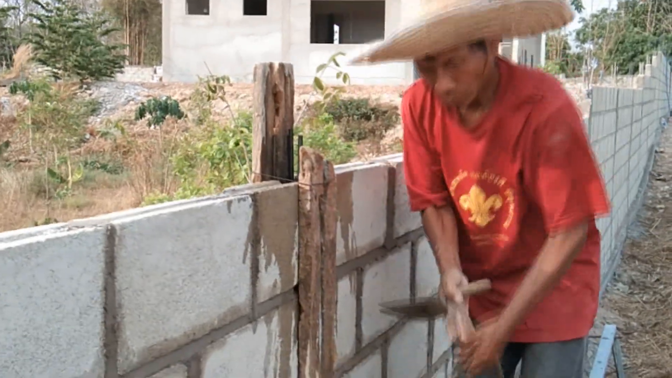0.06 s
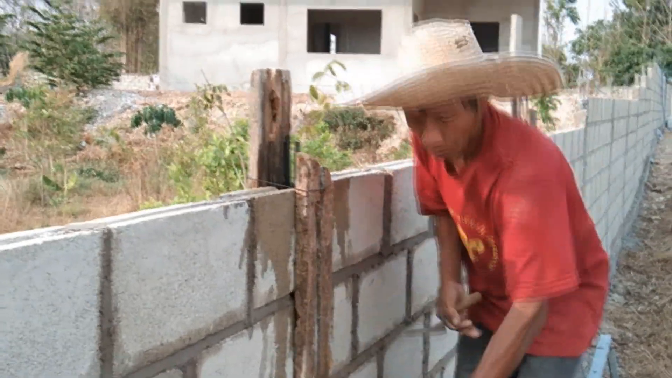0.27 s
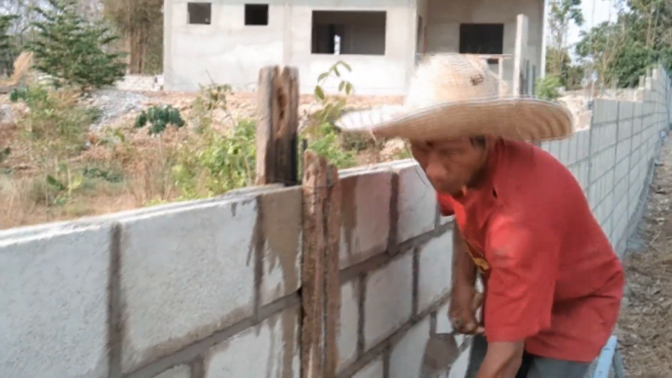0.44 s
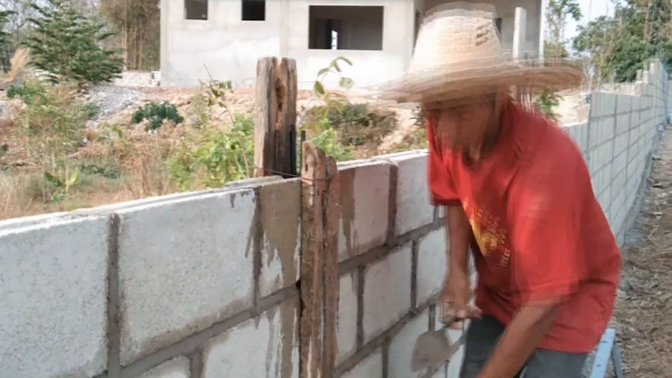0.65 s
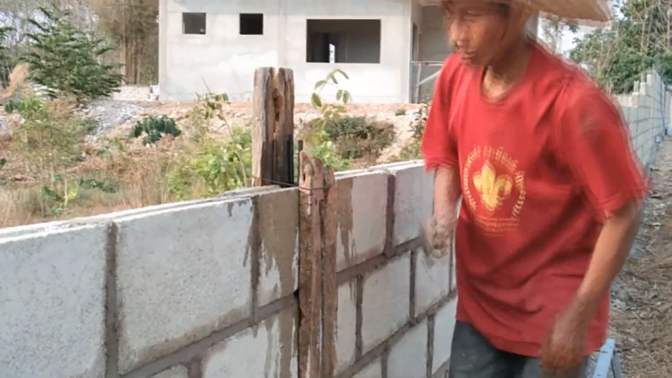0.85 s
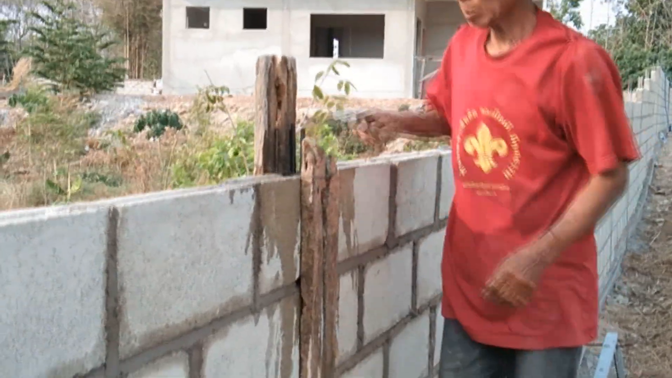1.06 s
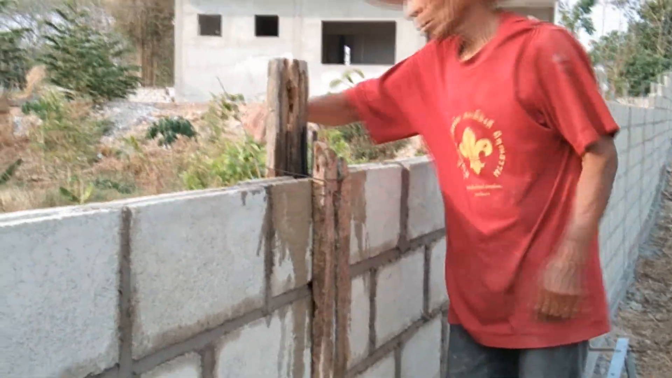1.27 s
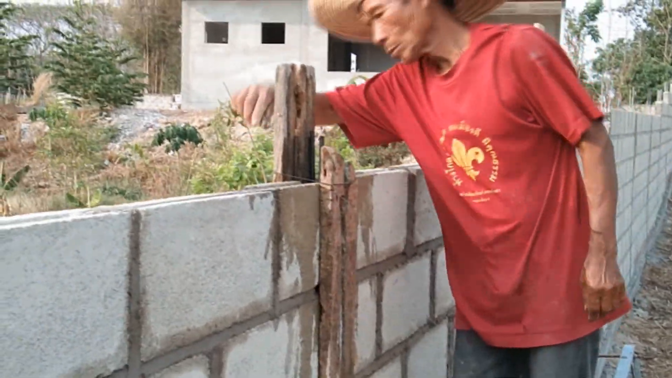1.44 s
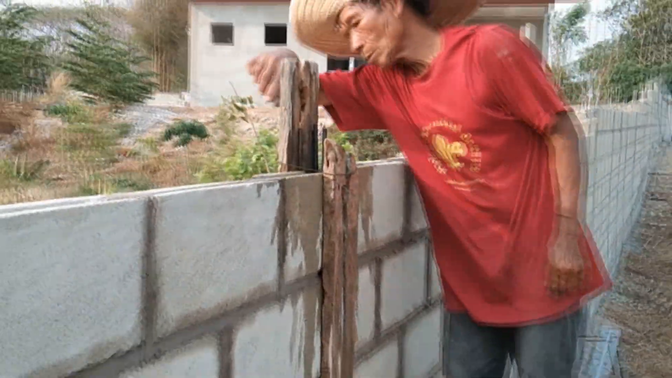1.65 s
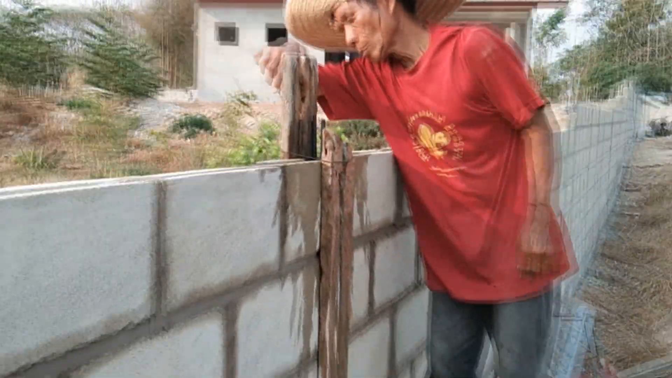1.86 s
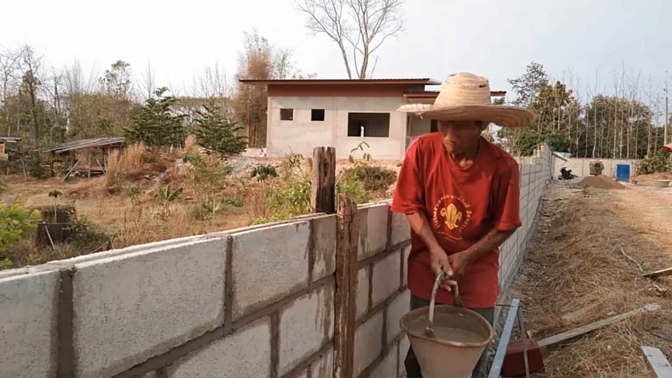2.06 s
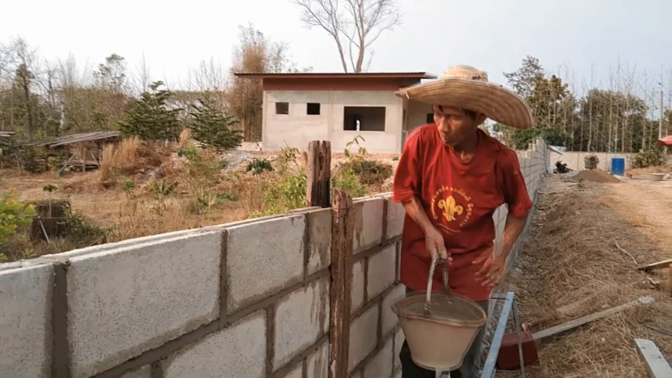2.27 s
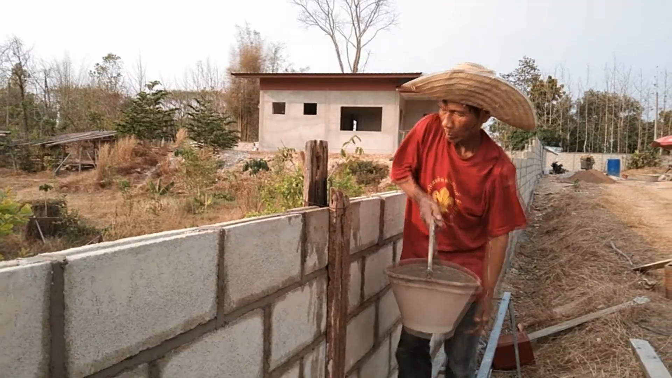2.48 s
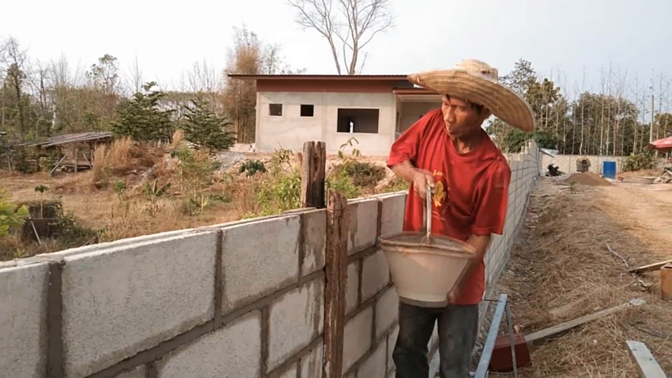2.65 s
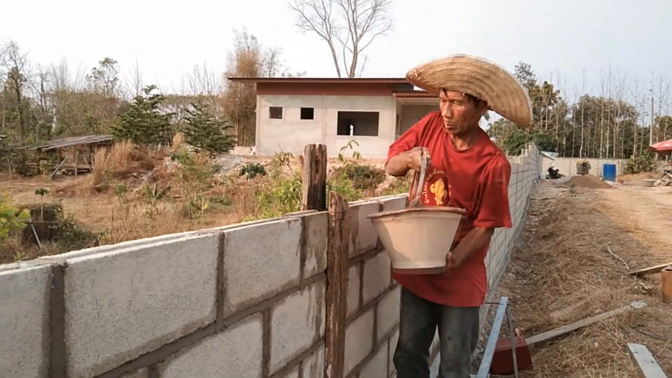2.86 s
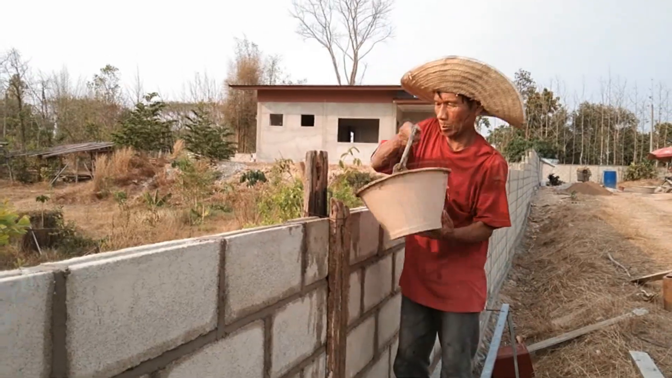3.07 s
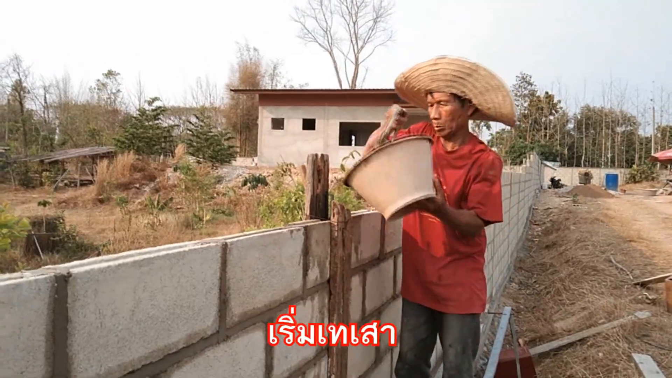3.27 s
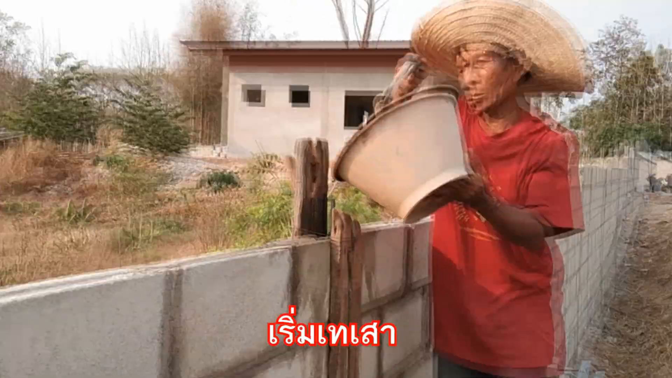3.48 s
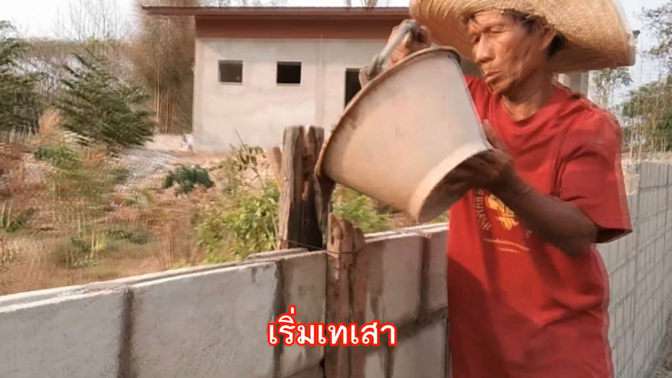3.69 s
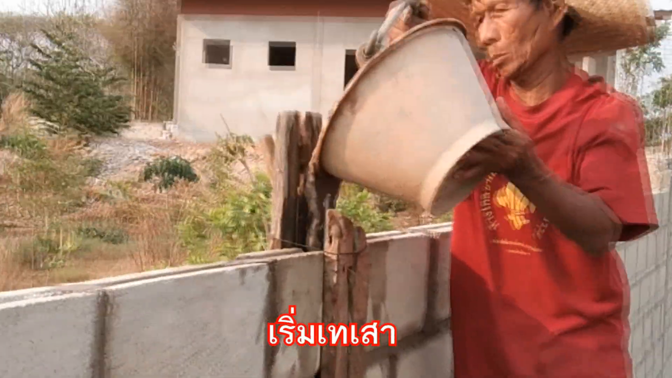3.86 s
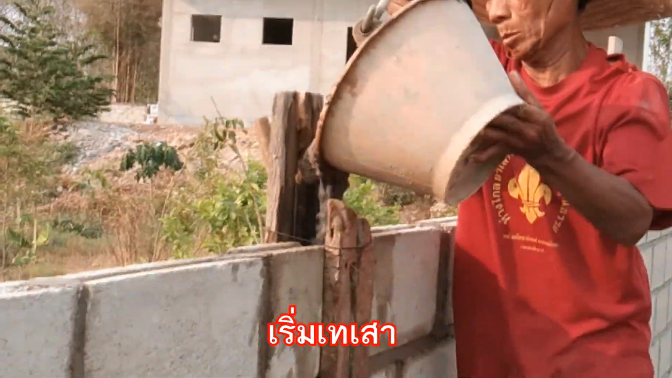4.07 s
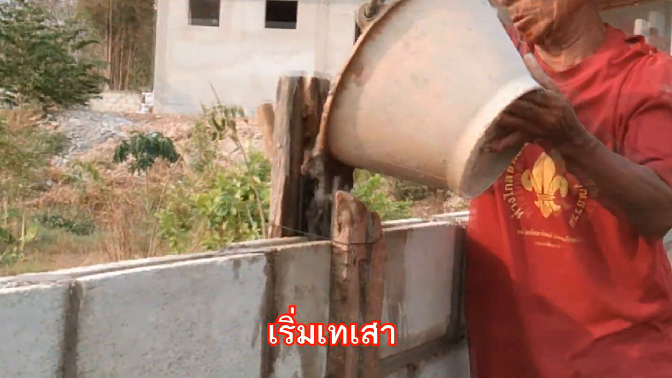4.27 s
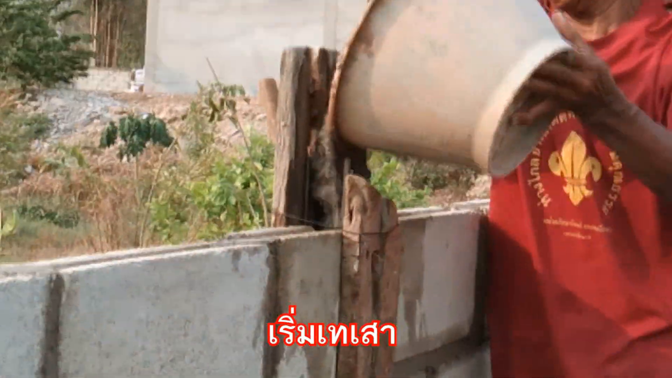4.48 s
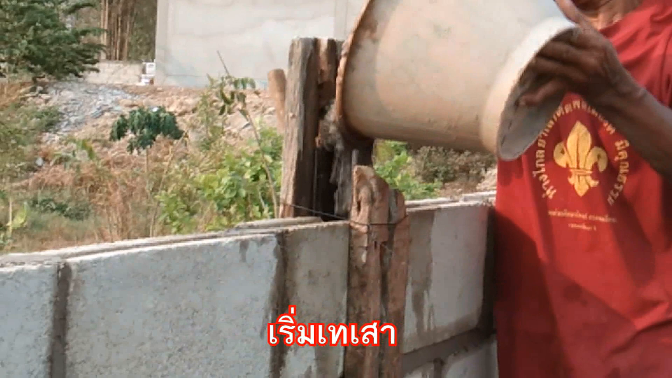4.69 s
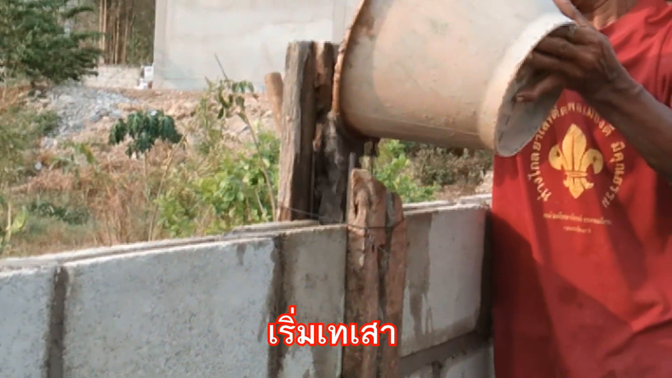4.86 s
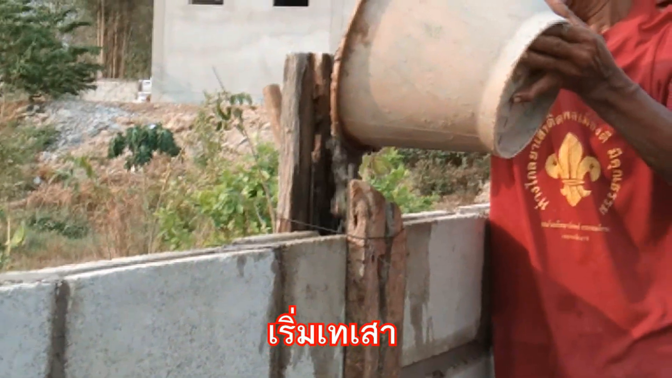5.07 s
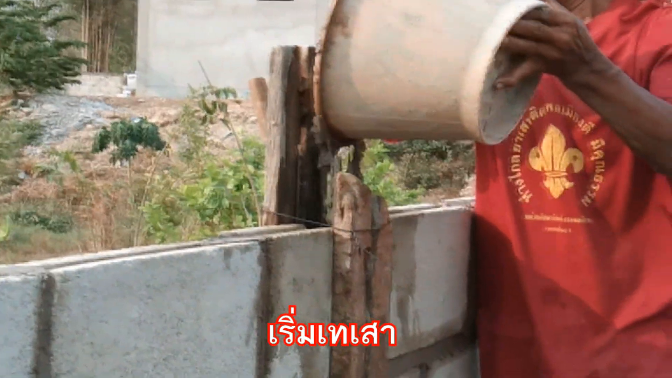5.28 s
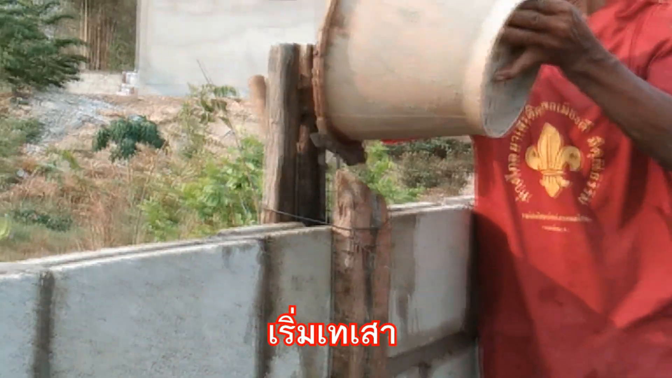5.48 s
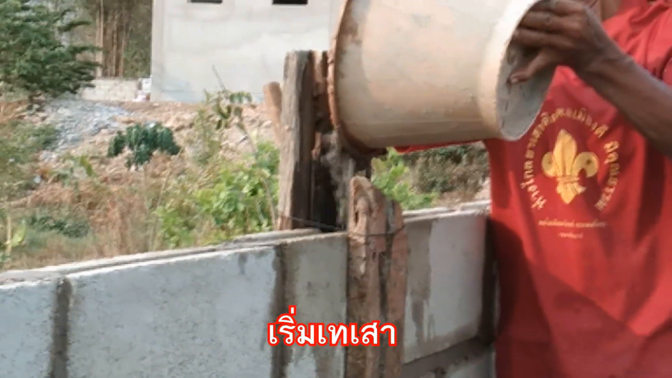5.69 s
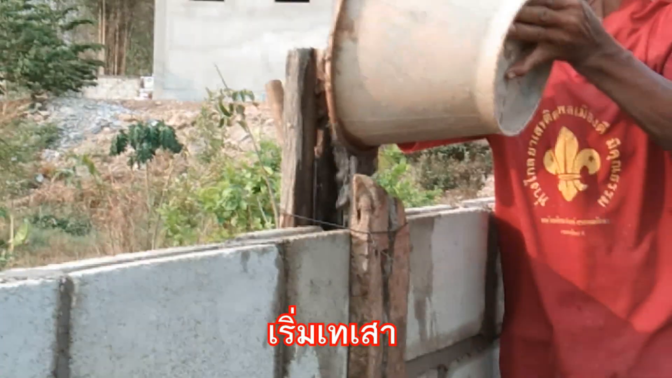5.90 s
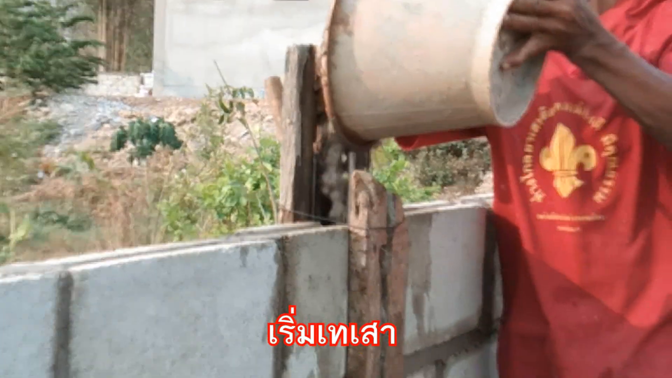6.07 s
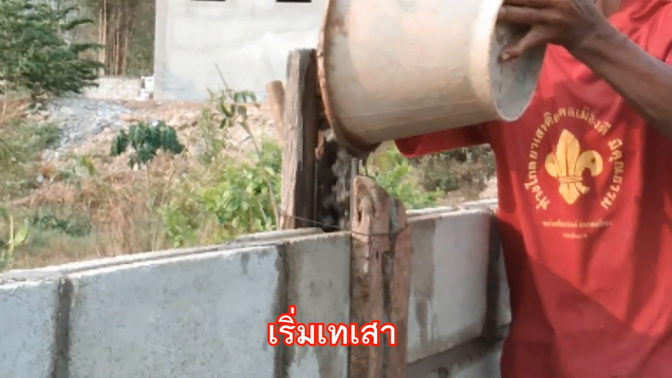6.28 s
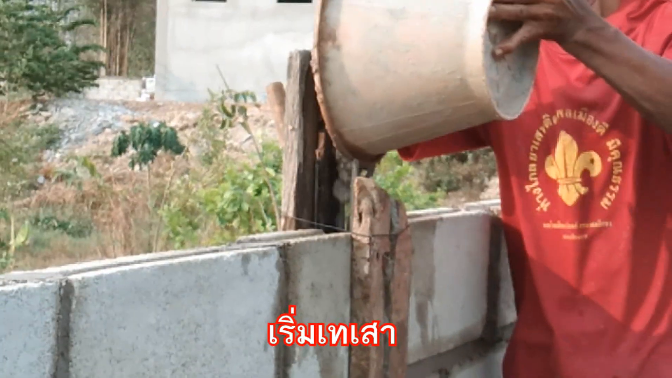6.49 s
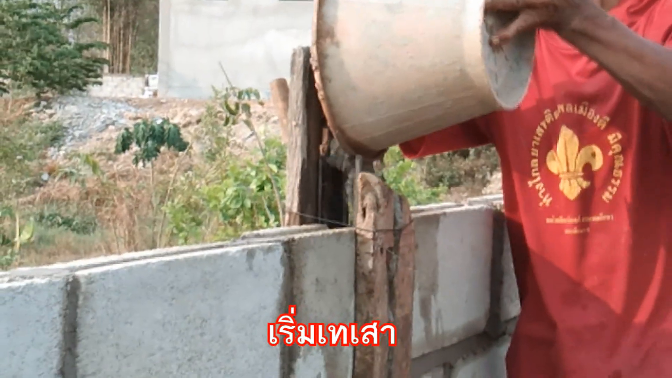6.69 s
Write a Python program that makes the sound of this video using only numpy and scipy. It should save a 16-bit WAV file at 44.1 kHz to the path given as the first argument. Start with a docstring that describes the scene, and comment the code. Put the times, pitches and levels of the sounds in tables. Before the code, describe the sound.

Outdoors, over a faint low murmur, grit scrapes in short dry strokes and boards give small woody knocks. A dragged bucket hums briefly, then its handle clanks on the lugs with a dull thud. After a quieter moment, the bucket hits the wooden form hard, and wet concrete pours in, hissing, spattering, drumming, ticking with pebbles and plopping until the end. Close, dry, small microphone with little bass.

```python
"""Over a low outdoor murmur a mason shuffles about a block wall: grit rubs by random stick and slip.
Blows ring the modes of a board, soft thuds excite one damped mode each, and friction draws thin squeaks.
A dragged bucket hums, its handle clanks on the lugs, and a hard knock falls on a wooden column form.
Concrete pours: wet gravel spatters and drums as random impacts, pebbles tick and air pockets plop.
Rubbing hiss and spatter are strongest near 5 kHz."""
import sys
import numpy as np
from scipy import signal
from scipy.fft import rfft, irfft, next_fast_len
from scipy.io import wavfile

SR = 44100
rng = np.random.default_rng(int(sys.argv[2]) if len(sys.argv) > 2 else 0)


def waveform_to_disk(signal):
    """Save audio, clipped to [-1, 1], as 16-bit WAV at the path in sys.argv[1]."""
    frames = np.transpose(np.atleast_2d(signal))
    scaled = np.clip(frames, -1, 1) * 32767
    samples = np.round(scaled).astype(np.int16)
    wavfile.write(sys.argv[1], SR, samples)


N = 297234


def amp(db):
    """Level definition: an amplitude gain is 10 to the power dB / 20."""
    return 10 ** (np.asarray(db) / 20)


def rms_one(x):
    """Normalisation of effective value: scale to rms 1."""
    return x / np.sqrt(np.mean(x ** 2) + 1e-20)


def filtered(x, order, hz, kind="band"):
    """Linear filtering: a causal Butterworth response."""
    return signal.sosfilt(signal.butter(order, hz, kind, fs=SR, output="sos"), x)


def in_time(rows):
    """Level interpolation: dB columns become gains, near silent outside the table's span."""
    s, *columns = np.transpose(rows)
    return [amp(np.interp(np.arange(N) / SR, s, c, left=-120, right=-120)) for c in columns]


def drift(rate):
    """Low-pass random process: two equal poles at rate (Hz) leave slow fluctuation of rms 1."""
    step = 40      # samples between the computed values
    r = np.exp(-2 * np.pi * rate * step / SR)
    noise = rng.standard_normal(N // step + 2002)
    slow = signal.lfilter([1], [1, -2 * r, r * r], noise)[2000:]      # settled part
    return np.interp(np.arange(N) / step, np.arange(len(slow)), rms_one(slow))


def grains(per_s, spread_db):
    """Shot noise: random clicks of uneven size and sign, rms 1."""
    sizes = amp(spread_db * np.minimum(rng.exponential(1, N), 5)) * rng.standard_normal(N)
    return rms_one(sizes * (rng.random(N) < per_s / SR))


def colour(x, spectrum, patchy_db, patch_rate):
    """Spectral shaping: bands two thirds of an octave apart flicker independently; rms 1."""
    hz, level_db = np.transpose(spectrum)
    size = next_fast_len(N)
    f = np.maximum(np.fft.rfftfreq(size, 1 / SR), 1)
    shaped = rfft(x, size) * amp(np.interp(np.log(f), np.log(hz), level_db, left=-120, right=-120))
    thirds = 3 * np.log2(f)      # third-octaves above 1 Hz
    out = 0
    for k in range(int(3 * np.log2(hz[0])), int(3 * np.log2(hz[-1])) + 2, 2):
        window = np.maximum(1 - abs(thirds - k) / 2, 0)      # overlapping triangles sum to one
        out = out + irfft(shaped * window, size)[:N] * amp(patchy_db * drift(patch_rate))
    return rms_one(out)


def ring(clicks, hz, t60):
    """Damped resonance: a unit click starts a decaying sine of initial height 1."""
    r, w = amp(-60 / (max(t60, .003) * SR)), 2 * np.pi * hz / SR
    return signal.lfilter([0, np.sin(w)], [1, -2 * r * np.cos(w), r * r], clicks + 1e-18)


def ringing_grains(per_s, spread_db, low_hz, high_hz, cycles, count):
    """Random modal excitation: grains ring some cycles at chance pitches, equal power per Hz."""
    clicks, dealt = grains(per_s, spread_db), rng.integers(0, count, N)
    pitches = np.geomspace(low_hz, high_hz, count) * np.exp(rng.normal(0, 0.03, count))
    return sum(np.sqrt(hz) * rms_one(ring(clicks * (dealt == k), hz, cycles / hz))
               for k, hz in enumerate(pitches))


def add(out, s, piece):
    """Superposition: mix a piece in at s seconds."""
    i = round(s * SR)
    out[i:i + len(piece)] += piece[:N - i]


# spectrum of distant traffic and breeze: f/Hz, relative level/dB (per Hz)
AIR_SPECTRUM = [(15, -60), (25, -41), (42, -0.5), (92, 1.5), (139, -2.5), (172, -1.5), (246, -13.5),
                (276, -10), (400, -15), (520, -58), (880, -120)]


def air():
    """Broadband ambient noise: white noise shaped to a flickering low murmur."""
    return amp(-59.5) * colour(rng.standard_normal(N), AIR_SPECTRUM, 4.6, 20.5)


# faint rustle between the strokes: t/s, hiss level/dB, body level/dB
RUSTLE = [(0.0, -65, -66), (0.5, -87, -82), (1.05, -91, -67), (1.28, -70, -64), (1.44, -70, -59),
          (1.5, -73, -59), (1.62, -73, -53.5), (1.85, -58, -56), (1.95, -66, -64), (2.15, -58, -74),
          (2.35, -57, -82), (2.55, -65, -74), (2.72, -67.5, -76), (2.9, -61.5, -77), (3.03, -77, -69),
          (3.16, -70.5, -64.5), (3.3, -62, -58), (3.42, -64.5, -67), (3.55, -58, -65), (3.62, -57, -66),
          (3.78, -53, -57.5), (3.85, -47, -60)]
# hands, feet and tools over grit: start t/s, hardest t/s, earliest end t/s,
# hiss level/dB, body level/dB (against hiss)
STROKES = [(0.0, 0, 0.036, -62, 16), (0.051, 0.073, 0.106, -48.5, -6), (0.197, 0.4, 0.48, -50, 1),
           (0.215, 0.255, 0.4, -54, 3), (0.508, 0.53, 0.61, -50, 1.5), (0.54, 0.707, 0.8, -50, 3.5),
           (0.79, 0.826, 0.86, -63.5, 8), (0.843, 0.963, 1.04, -51.5, 7.5),
           (1.103, 1.177, 1.29, -47.5, 3.5), (1.312, 1.327, 1.36, -56.5, 11), (1.344, 1.383, 1.416, -51, 8),
           (1.372, 1.411, 1.444, -46.5, 9), (1.511, 1.53, 1.63, -52, 2.5), (1.644, 1.81, 1.88, -49, 6.5),
           (1.862, 1.877, 1.95, -50, 0), (1.88, 1.92, 1.953, -49.5, -2), (1.97, 2.008, 2.12, -47.5, -4.5),
           (2.004, 2.086, 2.119, -51, -2), (2.085, 2.11, 2.31, -56, -10), (2.138, 2.25, 2.48, -48.5, -9),
           (2.255, 2.288, 2.321, -42, -12), (2.447, 2.455, 3.1, -57.5, -3), (2.53, 2.55, 2.59, -58, -4),
           (2.593, 2.624, 2.657, -59, 11), (2.823, 2.934, 3, -64.5, -3), (3.196, 3.211, 3.27, -44.5, -3),
           (3.21, 3.234, 3.267, -47, 1), (3.452, 3.466, 4.4, -55.5, -13), (3.55, 3.626, 4.5, -46.5, -8.5),
           (3.69, 3.71, 3.76, -47, -15), (3.772, 3.79, 3.823, -39, -35)]
# fine grit: f/Hz, relative level/dB (per Hz)
RUB_HISS = [(1650, -12), (2800, -31.5), (3350, -20.5), (4310, -3), (5570, 0), (6300, -2.5), (8030, -13),
            (9270, -12.5), (10900, -14), (12300, -16.5), (15500, -34)]
# shaken blocks and boards: f/Hz, relative level/dB (per Hz)
RUB_BODY = [(120, -55), (200, -9), (318, -13), (568, 0.5), (708, -6), (1210, -1.5), (1440, -5.5),
            (1680, -6), (2160, -14), (3200, -38.5), (4160, -81), (7040, -120)]
# rubbing hiss outside its core band, before the hiss level acts on it: t/s, level/dB
HISS_EDGE = [(0, -3), (1, 0.5), (1.9, -9.5), (2, 2.5), (2.12, 4), (2.6, -1), (2.75, -9.5), (3.15, 1),
             (3.25, -1), (3.45, -4), (3.7, 2.5), (4.3, 17), (6.74, 0)]
BITE_S, LIFT_S = 0.015, 0.021      # onset; quickest lift-off
START_UNDER_DB, END_UNDER_DB = 12.5, 25      # stroke ends, below its hardest moment
FULL_HISS_DB = -53.5      # hiss quieter than this loses its edges and the valley hollows out
CORE_HZ, EDGE_DB_PER_DB = (3960, 7050), 0.07
VALLEY_HZ, VALLEY_DB_PER_DB = (2300, 3870), 0.8      # valley between body and hiss


def rubbing():
    """Stick-slip friction: fine grit hisses, while coarser grit shakes the blocks and boards."""
    hiss, body = np.square(in_time(RUSTLE))      # powers
    for start, hardest, end, db, body_db in STROKES:
        end = max(end, hardest + LIFT_S)
        t = np.arange(round((end - start + .05) * SR)) / SR + start
        shape_db = np.interp(t, [start, max(hardest, start + .001), end, end + 0.071],
                             [-START_UNDER_DB, 0, -END_UNDER_DB, -60])
        power = (np.minimum((t - start) / BITE_S, 1) * amp(db + shape_db)) ** 2
        add(hiss, start, power)
        add(body, start, power * amp(2 * body_db))
    catch = amp(1.4 * drift(45))      # stick and slip swells both
    hiss_ratio = hiss / amp(2 * FULL_HISS_DB)      # power ratio
    band = signal.butter(2, CORE_HZ, "band", fs=SR, output="sos")
    fine = colour(grains(25000, 0.21), RUB_HISS, 1.85, 34)
    core = signal.sosfiltfilt(band, fine)
    fine = core + (fine - core) * in_time(HISS_EDGE)[0] * hiss_ratio ** (EDGE_DB_PER_DB / 2)
    shaken = ringing_grains(10000, 1.0, 194.5, 3666, 55.0, count=40)
    coarse = colour(shaken, RUB_BODY, 3.2, 8)
    rub = np.sqrt(hiss) * fine + np.sqrt(body) * coarse
    band = signal.butter(2, VALLEY_HZ, "band", fs=SR, output="sos")
    valley = signal.sosfiltfilt(band, rub)
    kept = np.minimum(hiss_ratio ** (VALLEY_DB_PER_DB / 2), 1)
    return catch * (rub - (1 - kept) * valley)


# blows on the boards: t/s, body peak level/dB, crack peak level/dB (against body), loudest region f/Hz
KNOCKS = [(0.066, -40, -14, 1530), (0.074, -36.5, 3, 1420), (0.522, -62, 6, 1230), (0.544, -34.5, -9, 474),
          (0.778, -20.5, -11, 576), (0.789, -26, -4, 570), (0.854, -30.5, -13, 1260), (0.86, -31, -13, 570),
          (1.11, -39.5, -23, 608), (1.318, -44, -22, 1430), (1.376, -41, -19, 627),
          (1.399, -37.5, -1, 1200), (1.406, -33, -1, 1220), (1.524, -50, -5, 613), (1.783, -35, -9, 1180),
          (1.818, -33.5, -3, 861), (2.278, -58.5, 24.5, 581), (2.454, -63, 17, 1150), (2.62, -53, -6, 1430),
          (2.662, -60, -10, 970), (3.47, -74, 6, 563), (3.825, -5.5, -20, 547), (3.829, -9, -3.5, 1060),
          (3.836, -4, -10, 1120), (3.844, -18, -3, 662), (3.892, -23, -23, 686), (3.863, -22, -22, 1000),
          (3.932, -21, -11.5, 1050), (3.945, -24.5, -10, 1000), (4.031, -32, -2.5, 1130),
          (4.226, -26, -5, 794), (4.513, -18.5, -13, 406), (4.732, -31, -15, 584), (5.145, -20, -15, 785),
          (6.521, -17, -12, 520), (6.717, -24.5, 2, 1140)]
# board modes before each blow's weighting and damping: f/Hz, relative level/dB, undamped t60/s
BOARD = [(190, -7, 0.17), (347, -40, 0.035), (437, -23, 0.074), (637, 18.5, 0.016), (638, 4, 0.14),
         (1037, 13.5, 0.074), (1150, 6, 0.099), (1310, 7, 0.04), (1530, 5, 0.097), (1790, -27, 0.019),
         (2430, -20, 0.024)]
CONTACT_S = 0.0053      # decay of the contact force
LIGHT_BLOW_DB, DAMPING_PER_DB = -31, .15      # harder blows press on the board and shorten its ring


def knocks():
    """Modal excitation by impact: gritty contact drives modes near the loudest region and cracks."""
    out, t = np.zeros(N), np.arange(SR // 4) / SR
    hz, level_db, t60 = np.transpose(BOARD)
    for s, db, crack_db, centre_hz in KNOCKS:
        ring_scale = 1 / (2.0 + DAMPING_PER_DB * max(db - LIGHT_BLOW_DB, 0))
        grit, chance_db = rng.standard_normal(len(t)), rng.normal(0, 2, len(BOARD))
        force = grit * np.minimum(t / 0.0003, 1) * np.exp(-t / CONTACT_S)
        strengths = amp(level_db + chance_db - 5.2 * np.log2(hz / centre_hz) ** 2)
        modes = sum(g * np.sqrt(d) * rms_one(ring(force, f, d * ring_scale))
                    for g, f, d in zip(strengths, hz, t60))
        body = filtered(modes, 3, [360, 2600])      # narrow wet boards: little bass, dull top
        brief = force * np.exp(-t / 0.0045)      # the crack is over before the boards stop
        crack = filtered(brief, 3, [3500, 7200])
        add(out, s, amp(db) * (body / abs(body).max() + amp(crack_db) * crack / abs(crack).max()))
    return out


# dull thuds of feet, bucket and lumps: t/s, peak level/dB, f/Hz, t60/s
THUDS = [(1.241, -35.5, 98, 0.055), (1.866, -41, 94, 0.12), (2.181, -46.5, 98, 0.042),
         (2.553, -39.5, 76, 0.073), (3.041, -44, 485, 0.011), (3.065, -36.5, 300, .012),
         (3.0775, -30, 1140, 0.0063), (3.0777, -24, 373, 0.0042), (3.111, -42, 800, 0.0033),
         (3.187, -19, 736, 0.0097), (3.187, -25.5, 318, 0.038), (3.219, -39, 164, 0.044),
         (3.852, -27.5, 190, 0.058), (3.905, -35, 190, .05), (3.935, -30.5, 184, 0.19),
         (4.02, -32, 197, 0.031), (4.652, -41, 149, 0.065), (4.938, -39.5, 207, 0.061),
         (5.118, -35.5, 120, 0.057), (5.284, -30.5, 148, 0.015), (5.403, -24.5, 132, 0.014),
         (6.5217, -16.5, 490, .05), (6.523, -23.5, 249.5, 0.059), (6.536, -35.5, 132, 0.07)]


def thuds():
    """Damped single resonance: a soft push half a cycle long excites one mode."""
    out, t = np.zeros(N), np.arange(SR // 4) / SR
    for s, db, hz, t60 in THUDS:
        push = np.sin(np.pi * np.minimum(2 * hz * t, 1)) ** 2
        thud = filtered(ring(push, hz, t60), 2, hz / 2, "high")
        add(out, s, amp(db) * thud / abs(thud).max())
    return out


# thin squeaks while things are handled: start t/s, length/s, rms level/dB before the swell, f/Hz
SQUEAKS = [(1.335, .065, -56, 2260), (1.49, 0.048, -52.5, 1690), (2.276, 0.042, -55.5, 2300),
           (3.56, .09, -66, 730), (3.705, .07, -56, 1400)]


def squeaks():
    """Narrow-band friction: noise passes one resonance twice, swelling and fading."""
    out = np.zeros(N)
    for s, length, db, hz in SQUEAKS:
        t = np.arange(round(length * SR)) / SR
        once = ring(rng.standard_normal(SR // 4), hz, .07)
        tone = rms_one(ring(once, hz, .07))[-len(t):]
        add(out, s, amp(db) * np.sin(np.pi * t / length) * tone)
    return out


# dragging of the bucket: t/s, level/dB
DRAG = [(1.97, -73), (2.01, -58), (2.04, -45), (2.085, -44), (2.095, -99)]
# bucket wall modes: f/Hz, relative level/dB, t60/s
BUCKET = [(267, 0, 0.69), (436, -6, 0.084), (550, -5, .1), (746, 6, 0.14), (980, -7, 0.14),
          (1270, -19, .15)]


def drag():
    """Friction-driven modes: noise keeps the bucket's walls humming until it is lifted clear."""
    friction, level = rng.standard_normal(N), in_time(DRAG)[0]
    span = slice(round(DRAG[1][0] * SR), round(DRAG[-1][0] * SR))
    hum = 0
    for hz, db, t60 in BUCKET:
        mode = ring(friction, hz, t60)
        hum = hum + amp(db) * mode / np.std(mode[span])
    return level * hum / np.std(hum[span])


# bucket handle on its lugs: t/s, ringing peak level/dB, contact decay/s, tilt/dB per octave about 4 kHz
CLANKS = [(3.057, -50, 0.0019, 13), (3.186, -30, 0.00037, -7), (3.19, -20.5, 0.0047, -2),
          (3.221, -40, 0.0075, 4), (3.233, -38, 0.0011, -9.5)]
# handle modes before the tilt: f/Hz, relative level/dB, t60/s
HANDLE = [(2264, -3.5, 0.053), (4000, -12, 0.084), (4640, -5, 0.023), (5690, 3, 0.035), (6520, -2.5, 0.048),
          (7400, -32, 0.025)]
CLANK_GRIT_DB, CLANK_GRIT_S = -26.5, 0.042      # dried mortar in the lugs: gain on its noise; decay


def clanks():
    """Modal ringing of thin steel: rattling contact excites the handle; dried mortar crunches."""
    out, t = np.zeros(N), np.arange(SR // 3) / SR
    for s, db, contact, tilt_db in CLANKS:
        sizes, signs = 1 + 0.87 * rng.standard_normal(len(t)), rng.choice([-1, 1], len(t))
        rattle = sizes * signs * np.exp(-t / contact)
        clank = 0
        for hz, level_db, t60 in HANDLE:
            strength = amp(level_db + tilt_db * np.log2(hz / 4000)) * np.sqrt(t60)
            clank = clank + strength * rms_one(ring(rattle, hz, t60))
        mortar = filtered(rng.standard_normal(len(t)), 2, [1500, 7500])
        crunch = mortar * np.exp(-t / CLANK_GRIT_S)
        add(out, s, amp(db) * (clank / abs(clank).max() + amp(CLANK_GRIT_DB) * crunch))
    return out


# stream of concrete before swells and breaks: t/s, spatter level/dB, board rumble level/dB
STREAM = [(3.85, -41, -28), (3.92, -48.5, -35.5), (3.94, -42.5, -31), (3.97, -54, -40), (4.0, -42.5, -41.5),
          (4.04, -46, -46.5), (4.13, -40, -49), (4.17, -50.5, -51.5), (4.26, -40, -38.5), (4.46, -34, -32),
          (5.06, -33, -33.5), (5.5, -35, -34), (5.8, -36, -35.5), (6.14, -36, -35.5), (6.38, -34.5, -33),
          (6.74, -38.5, -37)]
# clearest gouts landing: t/s, nominal spatter peak level/dB, t60/s, rumble level/dB (against spatter)
GOUTS = [(4.2024, -20.5, 0.32, -4.5), (4.319, -16.5, 0.15, -1), (4.3492, -19.5, 0.14, 0),
         (4.4084, -10.5, 0.037, 0), (4.442, -20, 0.33, -15), (4.5036, -19, 0.34, -1), (4.549, -13, 0.05, 1),
         (4.578, -18.5, 0.11, -15), (4.628, -10.5, 0.065, -14), (4.655, -18, 0.23, 2.5),
         (4.7017, -21, 0.34, -5), (4.802, -16.5, 0.16, -14), (4.846, -21, 0.04, -8),
         (4.883, -18, 0.44, -0.5), (4.9456, -17.5, 0.095, 3), (4.966, -11, 0.065, -12),
         (4.989, -19, 0.42, 4.5), (5.141, -13.5, 0.067, 0), (5.232, -17.5, 0.51, -7),
         (5.302, -14, 0.089, -3.5), (5.358, -13, 0.17, -4), (5.439, -11, 0.035, 0), (5.49, -16.5, 0.12, -1),
         (5.511, -16, 0.24, -3.5), (5.608, -13.5, 0.089, -4), (5.665, -23.5, 0.41, 1.5),
         (5.733, -16, 0.037, 2), (5.798, -17, 0.16, -4.5), (5.911, -12.5, 0.037, -11),
         (5.933, -19, 0.14, -0.5), (6.056, -14, 0.059, -8), (6.102, -19.5, 0.1, -9),
         (6.194, -15, 0.26, -1.5), (6.284, -17, 0.067, -14), (6.335, -17, .075, -14),
         (6.457, -16.5, 0.25, 0.5), (6.488, -11, 0.069, -16), (6.519, -12.5, 0.036, -2),
         (6.564, -14.5, 0.25, -4), (6.645, -12, 0.029, -10), (6.669, -19, 0.14, -3)]
# brief dips of the stream, negative for a swell: t/s, depth/dB
BREAKS = [(4.3, 3.5), (4.401, 3), (4.497, 5), (4.621, 1), (4.874, 3.5), (5.181, 6), (5.602, 2.5),
          (5.781, 5.5), (5.903, 2), (6.093, 10.5), (6.383, 4.5), (6.553, 3), (6.725, -2)]
# wet gravel: f/Hz, relative level/dB (per Hz)
SPATTER = [(1350, -12), (2300, -13), (2490, -16), (3300, -9), (3720, -10), (4190, -3), (5120, 1.5),
           (6000, -3.5), (7270, -16), (9390, -11), (12400, -25.5), (15500, -40)]
# drumming of the form: f/Hz, relative level/dB (per Hz)
RUMBLE = [(71, -7.5), (120, -22), (235, -12.5), (269, -5), (348, -14), (414, -1), (621, -1), (710, -6.5),
          (780, -0.5), (1040, -3.5), (1450, -10.5), (1980, -15), (2480, -25), (3000, -28), (3900, -56),
          (6600, -120)]
CREST_DB = 10      # nominal spatter peak over its rms
SMALL_GOUTS_PER_S, SMALL_GOUT_T60_S, SMALL_GOUT_DB = 30, .05, -4      # random ones; dB against stream
BREAK_S = 0.0084      # Gaussian half-width to 1/e of the depth in dB


def pour():
    """Random impact noise: gravel spatters and drums; each gout swells both powers and dies away."""
    spatter, rumble = in_time(STREAM)
    t = np.arange(SR // 4) / SR
    landings = rng.random(N) < SMALL_GOUTS_PER_S / SR
    small = landings * rng.exponential(1, N) * amp(2 * SMALL_GOUT_DB)
    swell = 1 + signal.lfilter([1], [1, -amp(-120 / (SMALL_GOUT_T60_S * SR))], small + 1e-18)
    high, low = spatter ** 2 * swell, rumble ** 2 * swell      # powers
    for s, db, t60, rumble_db in GOUTS:
        shape = (1 - np.exp(-t / .002)) * amp(-120 * t / t60)      # power envelope
        add(high, s - .001, amp(2 * (db - CREST_DB)) * shape)
        add(low, s - .001, amp(2 * (db - CREST_DB + rumble_db)) * shape)
    lull_db = sum(db * np.exp(-((np.arange(N) / SR - s) / BREAK_S) ** 2) for s, db in BREAKS)
    surge = amp(0.85 * drift(15) - lull_db)
    stones = colour(grains(18000, 1.0), SPATTER, 2.2, 40)
    struck = ringing_grains(8000, 0.99, 120.3, 3270, 36.0, count=36)
    drumming = colour(struck, RUMBLE, 1.6, 10)
    return surge * (np.sqrt(high) * stones + np.sqrt(low) * drumming)


# single pebbles striking the boards: t/s, peak level/dB of the tick
PEBBLES = [(4.2033, -29), (4.3145, -22), (4.349, -31), (4.3599, -19), (4.4078, -33), (4.4403, -26),
           (4.4887, -23), (4.5041, -25), (4.5515, -26), (4.5774, -18.5), (4.6084, -21), (4.6273, -26),
           (4.6543, -27), (4.7017, -25), (4.775, -19), (4.8019, -24), (4.8498, -18), (4.8808, -17),
           (4.9451, -19), (4.9671, -26), (4.9895, -16), (5.0918, -20), (5.1397, -22), (5.2045, -23),
           (5.234, -16.5), (5.3008, -19), (5.3607, -22), (5.414, -23), (5.443, -21.5), (5.4674, -19.5),
           (5.4894, -29), (5.5093, -28), (5.5877, -26), (5.6071, -19.5), (5.6375, -25), (5.661, -26),
           (5.6889, -17.5), (5.7318, -18), (5.7528, -18), (5.801, -34), (5.8491, -21.5), (5.882, -27),
           (5.9114, -21), (5.9309, -19.5), (6.0551, -28), (6.103, -19), (6.1753, -21), (6.1958, -31),
           (6.2452, -18), (6.2841, -25), (6.333, -23), (6.3589, -24), (6.3943, -37), (6.4063, -19),
           (6.4557, -30), (6.4866, -22), (6.519, -16), (6.5647, -25), (6.6428, -20.5), (6.6692, -26)]
PEBBLE_TOP_DB, PEBBLE_KNOCK_DB = -20, -17      # against the tick


def pebbles():
    """Short-contact impact: milliseconds of grit give a sharp tick, a little top and a dull knock."""
    out, t = np.zeros(N), np.arange(SR // 25) / SR
    grit = rng.standard_normal((len(PEBBLES), len(t))) * np.exp(-t / .004)
    parts = [filtered(grit, 2, band) for band in ((4000, 6300), (7800, 11000), (400, 2200))]
    tick, top, knock = [part / abs(part).max(axis=1, keepdims=True) for part in parts]
    for k, (s, db) in enumerate(PEBBLES):
        strike = tick[k] + amp(PEBBLE_TOP_DB) * top[k] + amp(PEBBLE_KNOCK_DB) * knock[k]
        add(out, s, amp(db) * strike)
    return out


# loudest wet lumps inside the form: t/s, level/dB before roughness and filtering, starting f/Hz
PLOPS = [(4.225, -25.5, 837), (4.313, -21, 1046), (4.367, -24, 1185), (4.467, -18, 497),
         (4.513, -16.5, 399), (4.535, -24.5, 1310), (4.566, -21, 1086), (4.649, -18.5, 405),
         (4.733, -19, 566), (4.74, -23.5, 1060), (4.77, -24, 1070), (4.8, -24, 1235), (4.843, -22.5, 1006),
         (4.945, -21.5, 492), (4.973, -20.5, 606), (5.065, -30, 413), (5.098, -29, 1090), (5.145, -22, 783),
         (5.236, -26, 460), (5.29, -23, 773), (5.337, -20.5, 778), (5.406, -24, 306), (5.474, -19.5, 512),
         (5.608, -26, 403), (5.756, -25, 441), (5.792, -30, 913), (5.911, -24.5, 638), (5.954, -23, 938),
         (6.045, -21, 532), (6.149, -20, 943), (6.199, -27, 550), (6.266, -26.5, 402), (6.391, -26, 523),
         (6.45, -33, 877), (6.468, -27, 562), (6.522, -16.5, 412), (6.565, -24.5, 436), (6.59, -26, 455),
         (6.645, -22, 462), (6.718, -38, 1146)]
PLOP_ROUGH, PLOP_SECOND, PLOP_SECOND_DB = 0.59, 1.45, -14      # grit share; second pocket: ratio, level
PLOP_FLOOR_HZ = 220      # pockets this small radiate little bass


def plops():
    """Air-cavity resonance: a pocket under each lump rings roughly, rising in pitch as it closes."""
    out, t = np.zeros(N), np.arange(SR // 6) / SR
    for s, db, hz in PLOPS:
        phase = 2 * np.pi * (hz * t * (1 + 0.714 * t) + rng.random())
        swell = np.minimum(t / .009, 1) * amp(-60 * t / .1)      # t60 0.1 s
        grit = signal.lfilter([.2], [1, -.98], rng.standard_normal(len(t)))
        tone = np.sin(phase) + amp(PLOP_SECOND_DB) * np.sin(PLOP_SECOND * phase)
        add(out, s, amp(db) * swell * tone * (1 + PLOP_ROUGH * grit))
    return filtered(out, 2, PLOP_FLOOR_HZ, "high")


def scene():
    """Superposition in open air: the direct sounds add, without reflections."""
    ground = air() + rubbing()
    concrete = pour() + pebbles() + plops()
    handling = knocks() + clanks() + drag() + squeaks() + thuds()
    return (ground + concrete + handling)[None]


OVERLOAD = .6      # peaks round off towards this amplitude


def record(dry):
    """Band limiting and soft saturation: a small microphone drops bass and rounds peaks; steep top cut."""
    thin = filtered(dry, 2, 55, "high")
    rounded = OVERLOAD * np.tanh(thin / OVERLOAD)
    return signal.sosfilt(signal.cheby2(16, 60, 15900, fs=SR, output="sos"), rounded)


dry = scene()
out = record(dry)
waveform_to_disk(out)
```